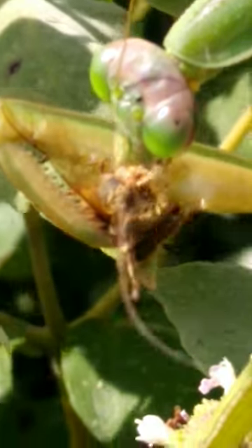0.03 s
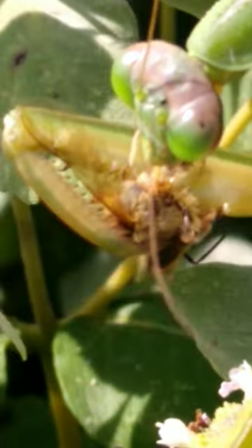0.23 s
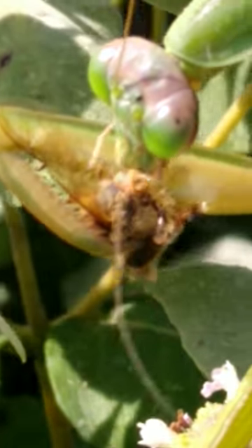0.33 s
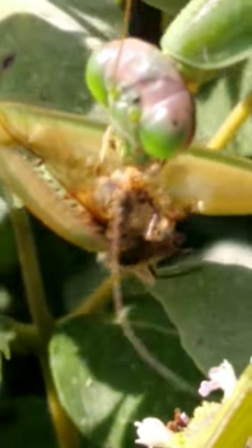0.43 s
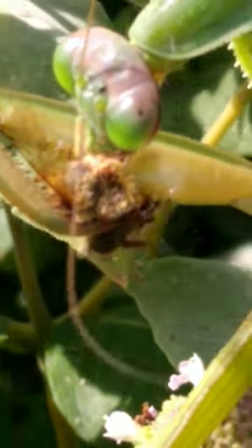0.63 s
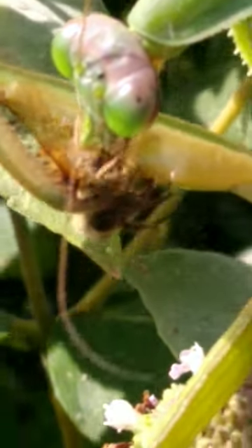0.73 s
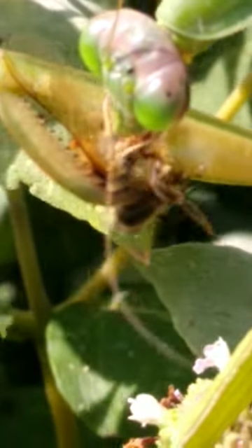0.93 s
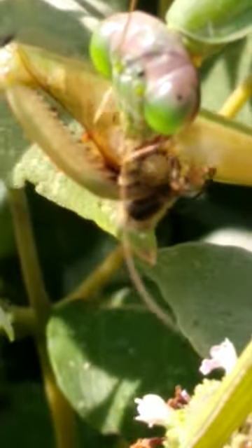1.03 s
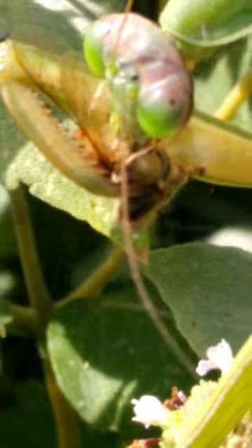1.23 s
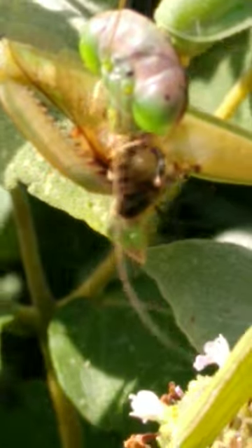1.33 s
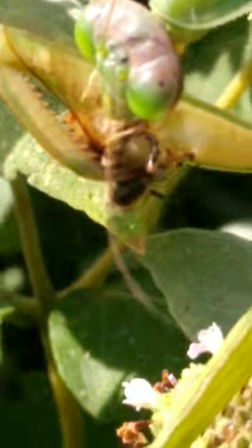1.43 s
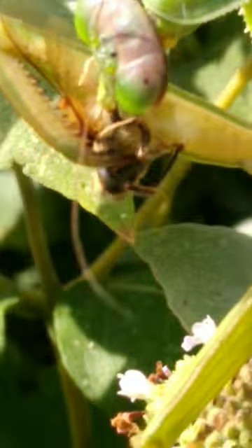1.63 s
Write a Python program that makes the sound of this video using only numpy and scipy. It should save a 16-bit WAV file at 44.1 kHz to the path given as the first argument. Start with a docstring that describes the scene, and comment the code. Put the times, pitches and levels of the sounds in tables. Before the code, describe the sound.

A fast, high-pitched cricket trill outdoors, over soft hiss and brief wind rumble.

```python
"""Sunny foliage, outdoors. Two crickets trill, each wing stroke drawing a scraper over a file: the near
one in short arched strokes, the second in falling ones, over a thin chorus. Wind eddies buffet the
microphone and the puffs stir the leaves. Soft hiss throughout; a faint far-off ring at the start."""
import sys
import numpy as np
from scipy import signal
from scipy.fft import rfft, irfft
from scipy.io import wavfile
from scipy.ndimage import uniform_filter1d

SR = 44100
rng = np.random.default_rng(int(sys.argv[2]) if len(sys.argv) > 2 else 0)


def int16_out(signal):
    """Quantize to a 16-bit WAV file."""
    q = np.round(np.clip(np.atleast_2d(signal).T, -1, 1) * 32767)
    wavfile.write(sys.argv[1], SR, q.astype(np.int16))


N = 74970

# air hiss spectrum (frequency [Hz], relative density [dB])
HISS_SPECTRUM = [(200,0),(300,-3),(480,-3),(700,-5),(1100,-5.5),(1600,-9),(2200,-12),(4200,-12),(5600,-17.5),(7000,-15.5),(7800,-35.5),(8400,-36),(11000,-37),(15000,-34)]
# near cricket's wing strokes (centre time [s], relative level [dB])
WING_STROKES = [(.0377,-69),(.0974,-68),(.1566,-68),(.2186,-64),(.2774,-62),(.34,-62),(.402,-58),(.4646,-60.5),(.5239,-59.5),(.5864,-60.5),(.6455,-61.5),(.7088,-61.5),(.7686,-63.5),(.8315,-60.5),(.8914,-66.5),(.9546,-65.5),(1.0153,-64.5),(1.079,-63.5),(1.1406,-60),(1.2013,-62.5),(1.2629,-62.5),(1.3261,-65),(1.3864,-65.5),(1.4477,-66.5),(1.5102,-65.5),(1.5697,-64.5),(1.6333,-64.5),(1.6947,-66.5)]
# thin, faint high tones sounding with each near stroke (frequency [Hz], relative level [dB])
THIN_HIGH_TONES = [(11260, -34.5), (15150, -48.5)]
# large-eddy envelope (time [s], relative level [dB])
RUMBLE_ENVELOPE = [(0.0, -65), (0.06, -59.5), (0.136, -71.5), (0.268, -30), (0.292, -47), (0.316, -33),
                   (0.34, -33), (0.364, -51.5), (0.392, -34.5), (0.426, -47.5), (0.472, -35.5),
                   (0.538, -35), (0.586, -46), (0.652, -37.5), (0.666, -34), (0.686, -69), (0.71, -53.5),
                   (0.752, -47.5), (0.77, -37.5), (0.794, -73), (0.814, -47), (0.908, -62), (0.95, -51),
                   (0.974, -69), (1.002, -47.5), (1.022, -43.5), (1.05, -69.5), (1.07, -48.5), (1.16, -36),
                   (1.212, -70.5), (1.258, -48), (1.302, -70.5), (1.676, -70), (1.7, -90)]
# large-eddy spectrum (frequency [Hz], relative density [dB])
RUMBLE_SPECTRUM = [(32,-11),(48,0.5),(65,4),(90,-2.5),(125,-9.5),(160,-21),(200,-29),(280,-42.5)]
# small-eddy envelope (time [s], relative level [dB])
FLUTTER_ENVELOPE = [(0,-86),(.17,-75),(.25,-56),(.325,-41.5),(.36,-53.5),(.43,-64.5),(.475,-48),(.52,-41.5),(.59,-63),(.64,-46.5),(.69,-72),(.75,-59),(.86,-77),(1.05,-92),(1.105,-53.5),(1.155,-63.5),(1.21,-79),(1.233,-66.5),(1.247,-56),(1.275,-81),(1.7,-83)]
# small-eddy spectrum (frequency [Hz], relative density [dB])
FLUTTER_SPECTRUM = [(115,0.5),(165,2),(210,0),(270,-9.5),(330,-16.5),(420,-25),(600,-43.5),(1000,-57.5)]
# leaf rustle envelope (time [s], level [dB])
RUSTLE_ENVELOPE = [(0,-86),(.17,-84),(.27,-72),(.38,-70.5),(.53,-70.5),(.66,-70.5),(.71,-80.5),(.78,-72.5),(.93,-81),(1.05,-79.5),(1.175,-73),(1.23,-83),(1.4,-91.5),(1.7,-91)]
# leaf rustle spectrum (frequency [Hz], relative density [dB])
RUSTLE_SPECTRUM = [(200,0.5),(500,1.5),(800,-1.5),(1150,3),(1550,-0.5),(2000,-5.5),(3200,-5.5),(4500,-5.5),(5500,-11.5),(7000,-8.5),(7900,-12.5),(8500,-40.5),(12000,-39.5)]
# dry leaf ticks (time [s], centre [Hz], width [Hz], half-length [s], level [dB])
LEAF_TICKS = [(0.377, 6440, 1063, 0.0029, -72), (.429, 3270, 600, 0.0016, -67),
              (0.432, 4200, 600, .003, -68)]


def undb(db):
    """Decibels to gain."""
    return 10 ** (np.asarray(db) / 20)


def curve(rows):
    """Linear interpolation of (time [s], value) rows."""
    return np.interp(np.arange(N) / SR, *np.array(rows).T)


def shaped(gain):
    """Unit-rms noise with spectrum gain(Hz)."""
    hz = np.maximum(np.fft.rfftfreq(N, 1 / SR), 1)
    noise = irfft(rfft(rng.standard_normal(N)) * gain(hz), N)
    return noise / np.std(noise)


def coloured(spectrum):
    """Noise from (frequency [Hz], density [dB]) rows; 12 dB/octave roll-off outside."""
    hz, db = np.array(spectrum).T

    def gain(f):
        skirts = (np.minimum(f / hz[0], 1) * np.minimum(hz[-1] / f, 1)) ** 2
        return undb(np.interp(np.log(f), np.log(hz), db)) * skirts
    return shaped(gain)


def band(hz, width_hz):
    """Noise in one steep-skirted resonance."""
    return shaped(lambda f: 1 / (1 + ((f - hz) / width_hz) ** 2) ** 2)


def waver(rate_hz):
    """Smooth unit-rms fluctuation."""
    return shaped(lambda f: np.exp(-(f / rate_hz) ** 2))


def swell(at_s, half_length_s):
    """Gaussian envelope."""
    return np.exp(-((np.arange(N) / SR - at_s) / half_length_s) ** 2)


def even(noise):
    """Noise held near unit rms over 20 ms."""
    power = uniform_filter1d(np.abs(signal.hilbert(noise)) ** 2, size=900) / 2
    return noise / np.sqrt(power)


def air_hiss(level_db=-76):
    """Steady outdoor hiss."""
    return undb(level_db) * coloured(HISS_SPECTRUM)


def far_ring(level_db=-78):
    """Faint far-off ring, soon fading."""
    return undb(level_db) * swell(at_s=.05, half_length_s=.1) * band(hz=1370, width_hz=360)


def trill(strokes, hz, width_s, fall_hz, bend_hz, jitter_hz, rough_db):
    """Scraper over uneven file teeth: per stroke, a tone that swells, bends and fades."""
    t, out = np.arange(N) / SR, np.zeros(N)
    unsteady_hz = jitter_hz * waver(210)
    for at_s, db in strokes:
        span = np.abs(t - at_s) < np.pi * width_s
        offset = (t[span] - at_s) / width_s
        pitch_hz = hz - fall_hz * offset - bend_hz * offset ** 2 + unsteady_hz[span]
        skewed = offset * (1 + .08 * np.sign(offset))  # rise slower than decay
        envelope = np.exp(-.45 * skewed ** 2 - skewed ** 4 / 60)
        cycles = np.cumsum(pitch_hz) / SR + rng.random()
        out[span] += undb(db) * envelope * np.sin(2 * np.pi * cycles)
    return out * undb(rough_db * waver(450))


def near_cricket(tone_gain_db=2.5):
    """Short wing strokes, arched in pitch; thin, faint high tones sound with each."""
    arch = dict(width_s=.0047, fall_hz=38, bend_hz=58.8)
    tone = undb(tone_gain_db) * trill(WING_STROKES, hz=7349, **arch, jitter_hz=15, rough_db=2.15)
    for hz, db in THIN_HIGH_TONES:
        tone += undb(db) * trill(WING_STROKES, hz, **arch, jitter_hz=60.3, rough_db=3)
    return tone


def second_cricket(first_s=.043, period_s=.0565, spread_s=.0014, gain_db=-12, spread_db=1.6):
    """Each stroke starts high and falls as the wings slow."""
    strokes = [(at_s + spread_s * rng.standard_normal(), gain_db + spread_db * rng.standard_normal())
               for at_s in np.arange(first_s, N / SR, period_s)]
    return trill(strokes, hz=7566, width_s=.008, fall_hz=456, bend_hz=127, jitter_hz=60.7, rough_db=3)


def leaf_scatter(direct, t60_s=.19, gain_db=-11):
    """Short diffuse tail from reflections off leaves."""
    lag_s = np.arange(SR // 4) / SR
    tail = rng.standard_normal(len(lag_s)) * undb(-60 * lag_s / t60_s)
    return undb(gain_db) * signal.fftconvolve(direct, tail / np.linalg.norm(tail))[:N]


def crickets(chorus_gain_db=-17):
    """Two crickets, their scatter and a thin chorus; all follow the near one's level."""
    loudness = undb(curve(WING_STROKES))
    direct = near_cricket() + loudness * second_cricket()
    scattered = leaf_scatter(direct)
    chorus = undb(chorus_gain_db) * loudness * band(hz=7470, width_hz=400)
    return direct + scattered + chorus


def wind_buffet(rumble_gain_db=.5, flutter_gain_db=-.5):
    """Large eddies thump the microphone; stronger puffs add a flutter of small ones."""
    rumble = undb(curve(RUMBLE_ENVELOPE) + rumble_gain_db) * even(coloured(RUMBLE_SPECTRUM))
    flutter = undb(curve(FLUTTER_ENVELOPE) + flutter_gain_db) * even(coloured(FLUTTER_SPECTRUM))
    return rumble + flutter


def leaves(snaps_per_s=670, crackle_band_hz=(2500, 6800), top_hz=7200, crackle_db=-11, flicker_db=1.1):
    """Wind-stirred leaves: flickering rustle, fine crackle, a few dry ticks."""
    snaps = (rng.random(N) < snaps_per_s / SR) * rng.standard_normal(N)
    crackle = signal.sosfilt(signal.butter(5, crackle_band_hz, "bandpass", fs=SR, output="sos"), snaps)
    crackle = signal.sosfilt(signal.butter(10, top_hz, fs=SR, output="sos"), crackle)
    rustle = coloured(RUSTLE_SPECTRUM) + undb(crackle_db) * crackle / np.std(crackle)
    envelope = undb(curve(RUSTLE_ENVELOPE) + flicker_db * waver(60))
    ticks = sum(undb(db) * swell(at_s, half_length_s) * band(hz, width_hz)
                for at_s, hz, width_hz, half_length_s, db in LEAF_TICKS)
    return envelope * rustle + ticks


def scene():
    """Mono sum at the microphone."""
    return (crickets() + wind_buffet() + leaves() + air_hiss() + far_ring())[None]


def record(dry, low_cut_hz=35.5, high_cut_hz=15500):
    """Recorder band limits: zero-phase low cut, steep high cut."""
    thinned = signal.sosfiltfilt(signal.butter(3, low_cut_hz, "highpass", fs=SR, output="sos"), dry)
    return signal.sosfilt(signal.ellip(8, .2, 70, high_cut_hz, fs=SR, output="sos"), thinned)


dry = scene()
out = record(dry)
int16_out(out)
```